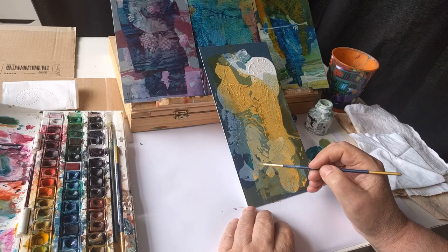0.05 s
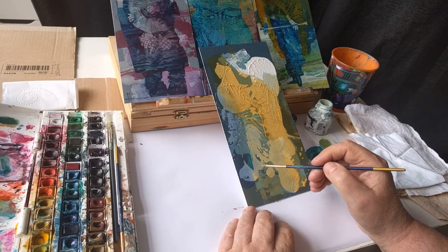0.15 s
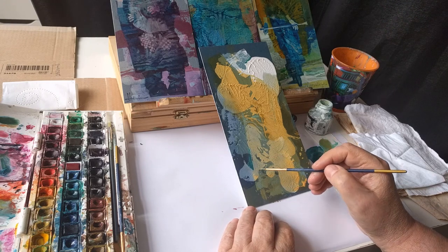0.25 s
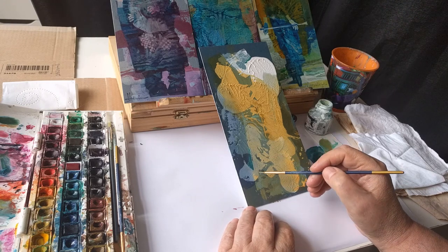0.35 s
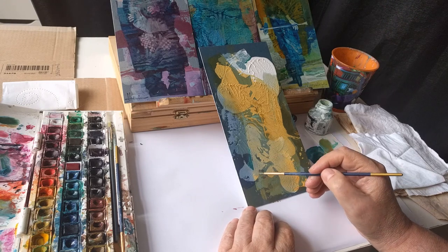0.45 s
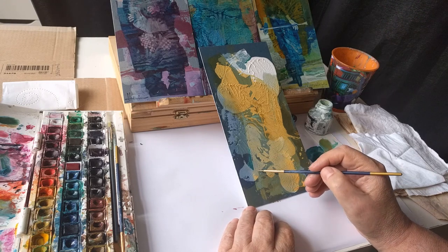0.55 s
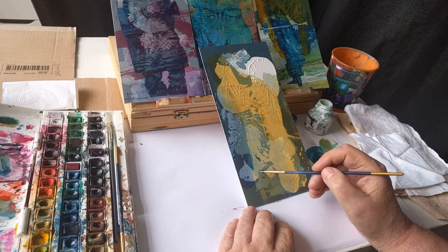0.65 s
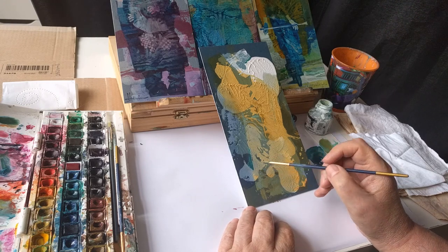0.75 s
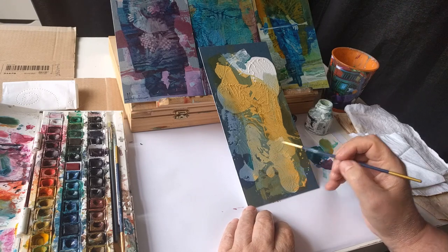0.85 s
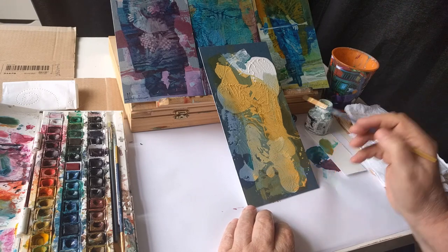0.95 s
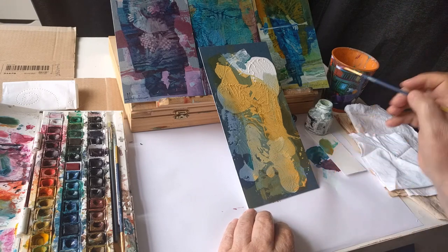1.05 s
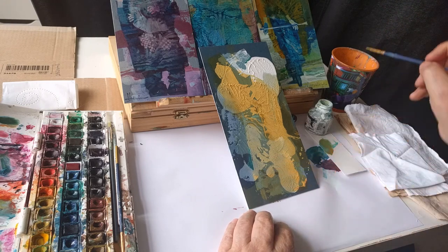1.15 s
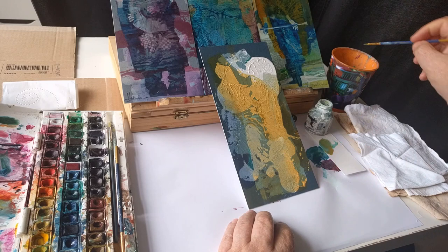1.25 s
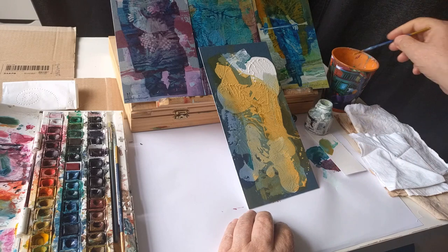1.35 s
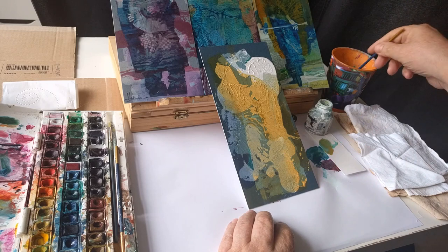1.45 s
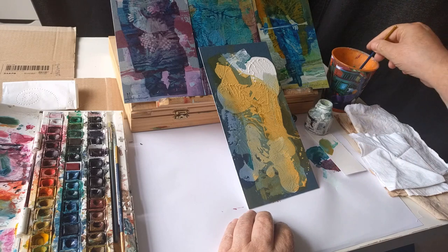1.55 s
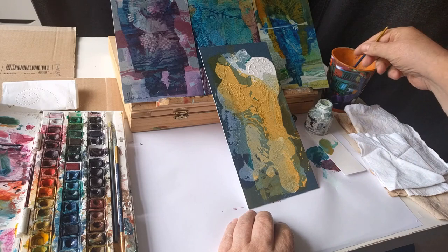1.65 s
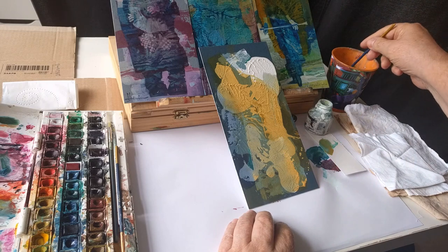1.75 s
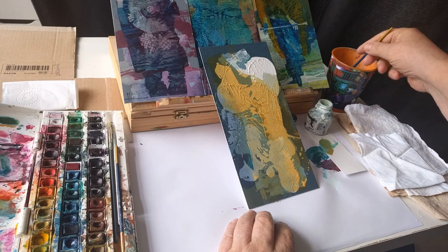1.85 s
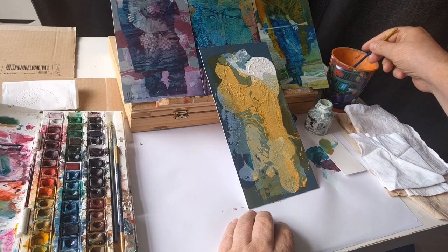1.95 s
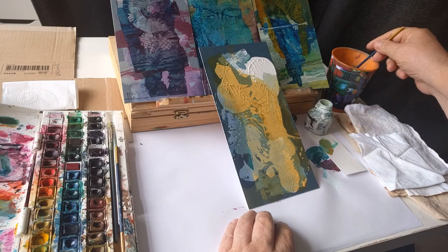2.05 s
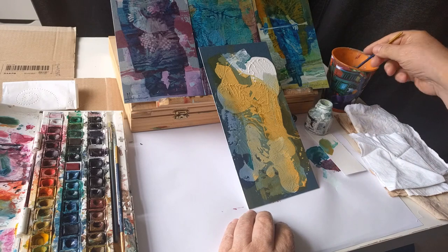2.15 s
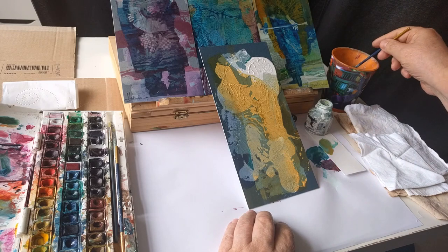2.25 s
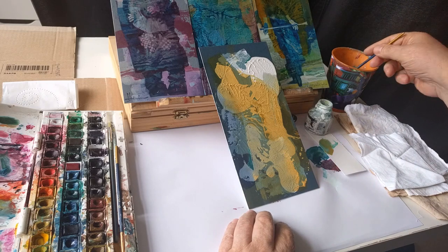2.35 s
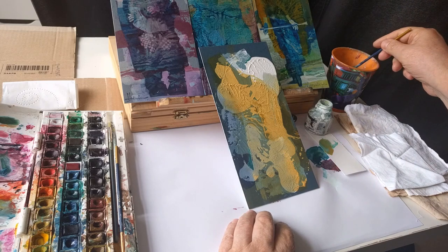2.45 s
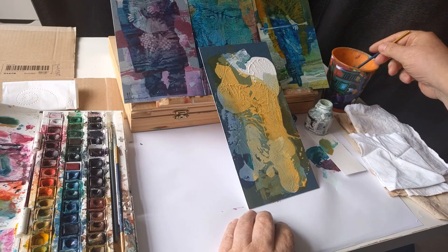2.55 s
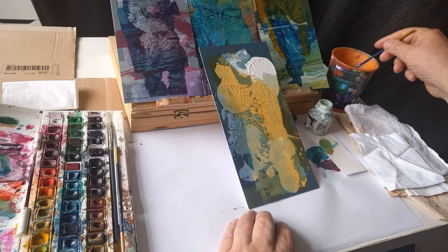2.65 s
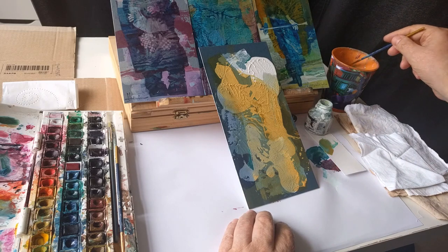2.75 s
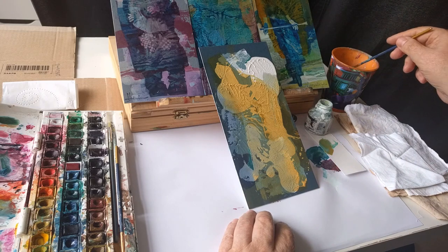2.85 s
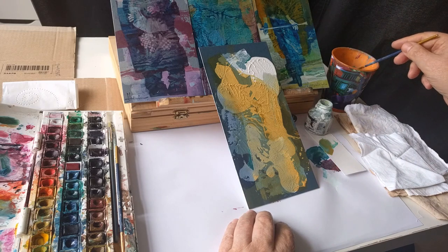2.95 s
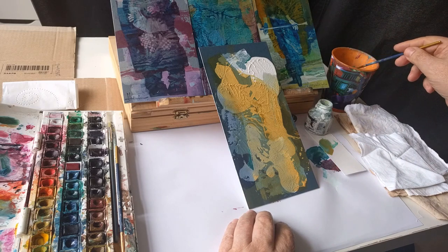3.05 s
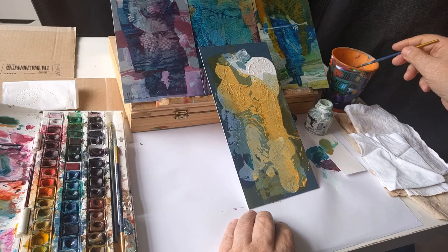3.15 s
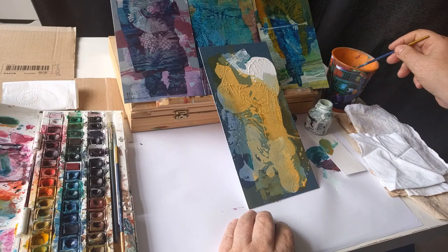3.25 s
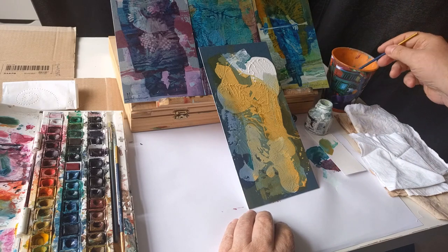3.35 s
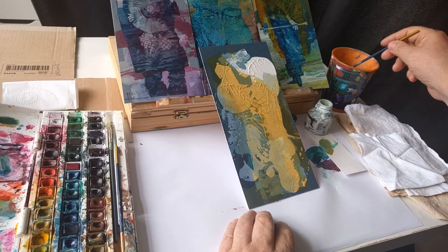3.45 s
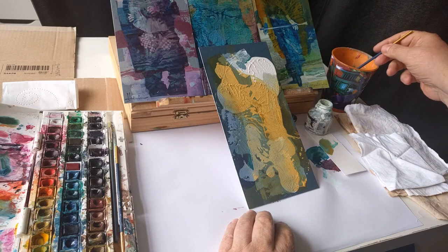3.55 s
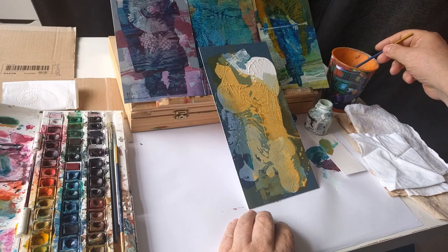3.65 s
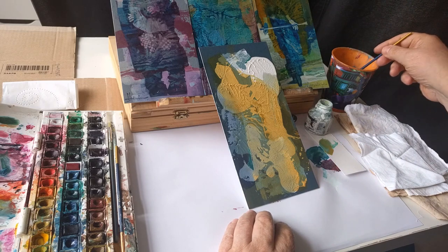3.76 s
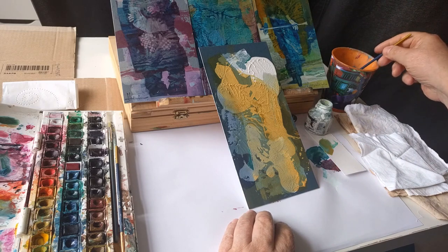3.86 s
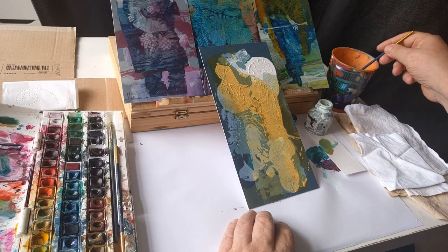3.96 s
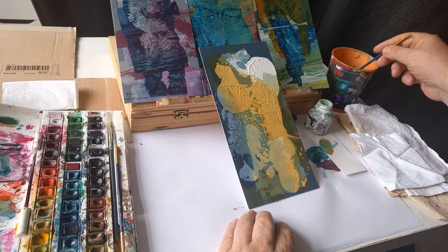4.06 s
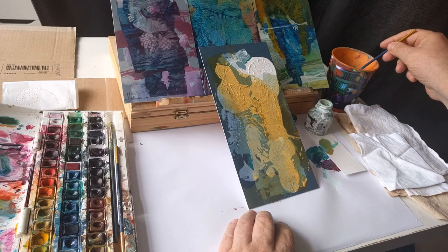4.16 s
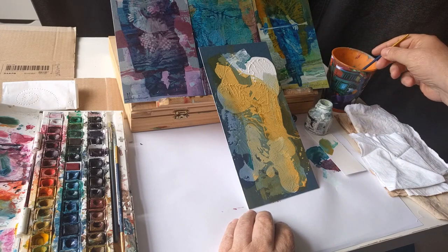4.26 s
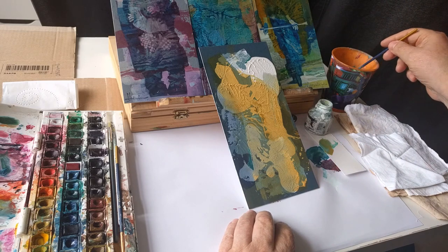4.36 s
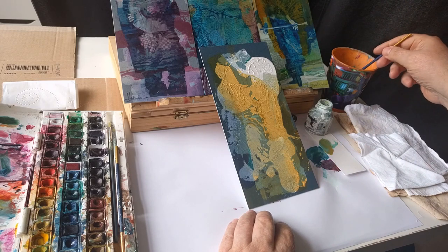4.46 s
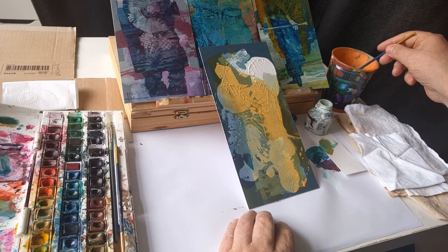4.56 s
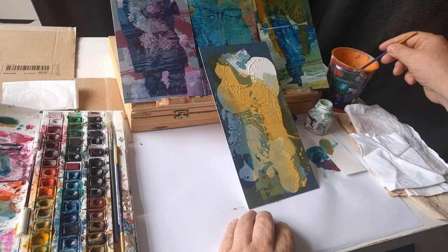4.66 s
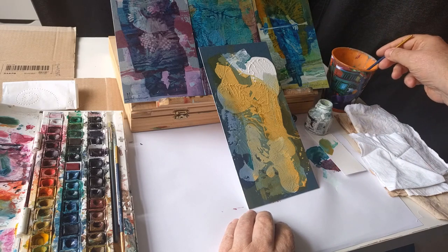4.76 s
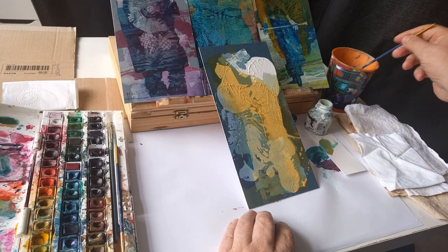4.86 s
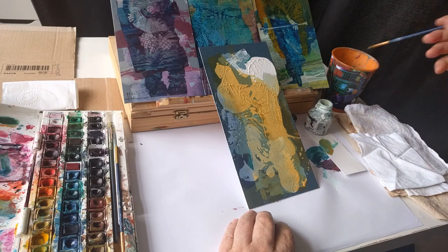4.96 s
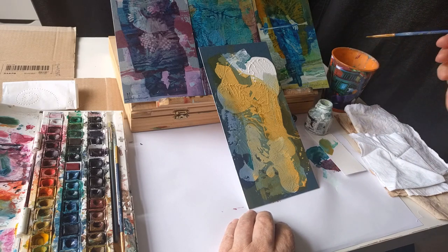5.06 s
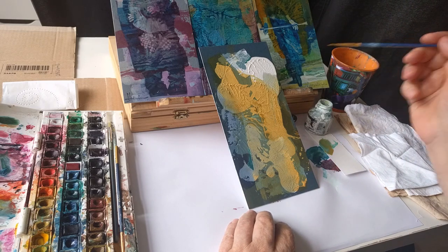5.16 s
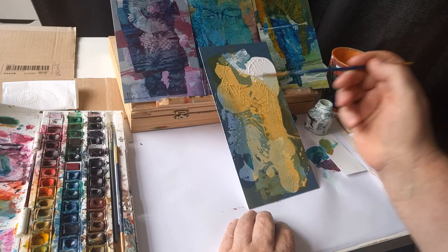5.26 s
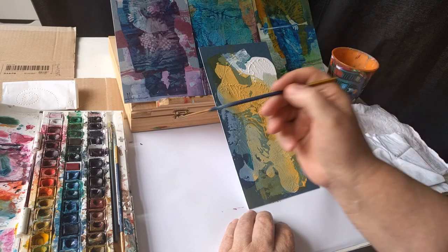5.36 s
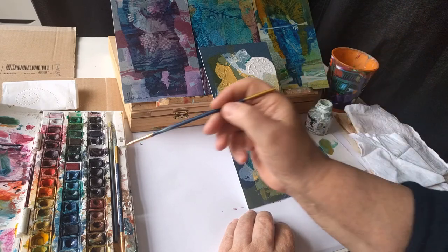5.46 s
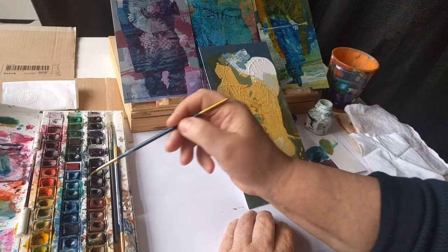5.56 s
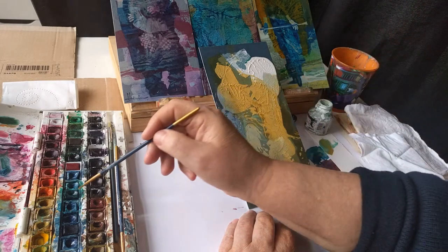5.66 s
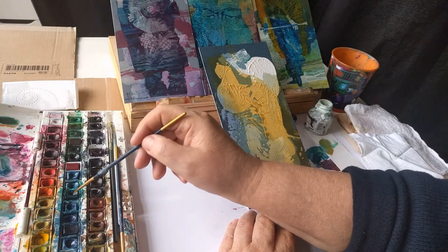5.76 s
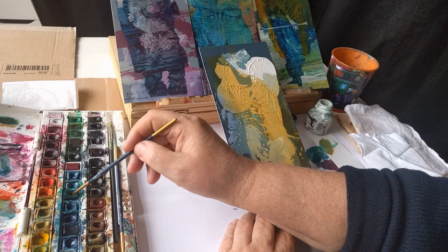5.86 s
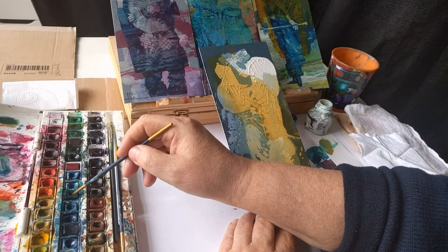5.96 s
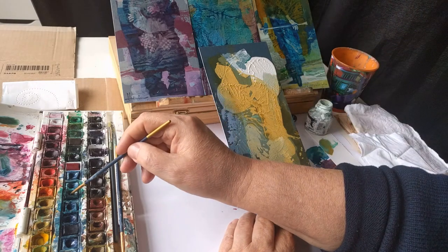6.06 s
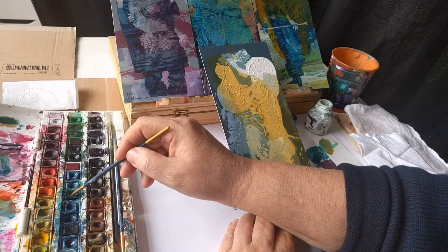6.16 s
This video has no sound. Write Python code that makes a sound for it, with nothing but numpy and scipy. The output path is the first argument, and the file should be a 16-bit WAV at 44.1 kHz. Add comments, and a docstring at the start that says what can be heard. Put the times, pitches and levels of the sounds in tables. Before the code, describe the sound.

In a small quiet room, a brush knocks a water jar with sharp, dry clinks, two of them strong, then stirs the water with soft sloshes, plops and fizz. After a short lull a second bout begins with a lighter clink. It stops, and a small dry dab ends it. Close microphone, faint hiss and low hum.

```python
"""A paintbrush rinsed in a jar of water knocks the jar four times: hard contacts excite wall modes.
It stirs the water in two bouts, whose sloshes, plops, trickle and fizz are decaying sines of trapped air.
Ticks, droplets and a late dab of the brush are short pings and noise bursts, heard with the jar in a small room.
Table bumps and the rustling sleeve are shaped noise, over the microphone's hiss, a low hum and a thin whine."""
import sys
import numpy as np
from scipy import signal
from scipy.fft import rfft, irfft
from scipy.io import wavfile

SR = 44100
rng = np.random.default_rng(int(sys.argv[2]) if len(sys.argv) > 2 else 0)


def unload_audio(sound):
    """Save the sound as a 16-bit wav file, at the path given as the first command line argument."""
    columns = np.transpose(np.atleast_2d(sound))
    # keep every value between -1 and 1, then stretch to whole-number steps
    steps = np.round(np.clip(columns, -1, 1) * 32767)
    wavfile.write(sys.argv[1], SR, steps.astype(np.int16))


N = 274302
TIME = np.arange(N) / SR


def amp(db):
    """Level: decibels become an amplitude ratio."""
    return 10 ** (np.asarray(db) / 20)


def evened(x):
    """Normalisation: the signal is scaled to an rms of one."""
    return x / np.sqrt(np.mean(x ** 2) + 1e-20)


def read(points, hz):
    """Spectral interpolation: a table is read on a logarithmic frequency axis."""
    f, value = np.transpose(points)
    return np.interp(np.log(hz + 1e-6), np.log(f), value)


def add(mix, s, sound):
    """Superposition: a sound is summed into the mix from time s."""
    part = mix[max(round(s * SR), 0):][:len(sound)]
    part += sound[:len(part)]


def decay(t, t60):
    """Exponential damping: the amplitude falls 60 dB in t60 seconds."""
    return np.exp(-np.log(1000) * t / t60)


def swell(t, peak_s):
    """Rise and fall: an envelope that reaches one at peak_s and then dies away."""
    return t / peak_s * np.exp(1 - t / peak_s)


def noise(spectrum, size):
    """Spectral shaping: white noise is filtered to a given spectrum at unit rms."""
    white = rfft(rng.standard_normal(size))
    gain = amp(read(spectrum, np.fft.rfftfreq(size, 1 / SR)))
    return evened(irfft(white * gain, size))


def click(colour_db, size=2048):
    """Minimum phase: a causal pulse of peak one gets its shape from the spectrum colour_db(Hz)."""
    log_gain = np.log(amp(colour_db(abs(np.fft.fftfreq(size, 1 / SR)))))
    pulse = np.fft.ifft(np.exp(np.conj(signal.hilbert(log_gain)))).real
    return pulse / abs(pulse).max()


def bubble(hz, t60, rise=0.04, onset_s=0.00096):
    """Bubble resonance: a trapped air pocket rings, its pitch climbing as it nears the surface."""
    t = np.arange(int(t60 * SR) + 2) / SR
    # the pitch climbs by the fraction `rise` over t60, passing hz a quarter of the way
    phase = 2 * np.pi * hz * t * (1 + rise * (t / t60 - .5) / 2)
    return np.sin(phase) * decay(t, t60) * (1 - np.exp(-t / onset_s))


# hiss spectrum: pitch_hz [Hz], level_db [dB, relative]
HISS_SPECTRUM = [(20, -5), (40, -3), (60, -2), (85, -7.5), (130, 1), (185, 5.5), (260, -4.5), (600, -7),
                 (1500, -14.5), (3000, -16), (5500, -11.5), (6500, -12.5), (7500, -5.5), (8700, 2),
                 (9500, -9.5), (11500, -16), (14000, -14.5), (15700, -17)]
HUM_HZ, WHINE_HZ = 59.2, 9000
HUM_DB, WHINE_DB = -64, -78  # rms


def background(hiss_db=-60.5, waver_hz=4):
    """Stationary noise and tones: steady hiss, a slightly wavering low hum and a thin electrical whine."""
    slow = [(waver_hz, 0), (3 * waver_hz, -30), (100, -100)]
    drift, wander = noise(slow, N), noise(slow, N)
    # a complex sway moves both the strength and the phase of the hum
    sway = 1 + .25 * (drift + 1j * wander)
    hum = (sway * np.exp(2j * np.pi * HUM_HZ * TIME)).real
    whine = np.sin(2 * np.pi * WHINE_HZ * TIME)
    hiss = amp(hiss_db) * noise(HISS_SPECTRUM, N)
    return hiss + amp(HUM_DB) * evened(hum) + amp(WHINE_DB) * evened(whine)


# cloth spectrum: pitch_hz [Hz], level_db [dB, relative]
CLOTH_SPECTRUM = [(30, -4.5), (70, 7.5), (110, 1.5), (180, -4), (290, -5.5), (400, -2), (600, -10),
                  (1200, -10), (2200, -12), (2800, -18.5), (3600, -15), (4500, -45), (14000, -29.5)]
# the arm lifts, reaches for the jar, stirs twice and crosses to the paints:
# middle_s [s], level_db [dB, added in power to the resting level], half_length_s [s]
ARM_MOVES_TABLE = [(0.712, -68, 0.094), (1.322, -66, 0.18), (2.25, -67, 0.65), (4.3, -69, 0.77),
                   (5.99, -61, 0.27)]


def sleeve(rest_db=-69.5):
    """Friction noise: cloth rubs softly, its power swelling and fading with each move of the arm."""
    power = amp(rest_db) ** 2
    for s, db, half in ARM_MOVES_TABLE:
        power = power + amp(db) ** 2 * np.exp(-((TIME - s) / half) ** 2)
    return np.sqrt(power) * noise(CLOTH_SPECTRUM, N)


# the hand and the jar bump the table: start_s [s], level_db [dB], pitch_hz [Hz]
TABLE_BUMPS = [(0.359, -61, 188), (0.41, -65, 177), (.7, -60, 192), (1.749, -59, 232), (4.331, -59.5, 139),
               (4.678, -68, 170)]


def nudges(peak_s=0.018, size=16384):
    """Damped low-frequency impact: soft, dull bumps of the table top are narrow noise that swells and dies."""
    out, t = np.zeros(N), np.arange(size) / SR
    for s, db, hz in TABLE_BUMPS:
        thud = noise([(hz / 2, -25), (hz, 0), (1.3 * hz, -14), (10 * hz, -45), (20 * hz, -80)], size)
        add(out, s, amp(db) * thud * swell(t, peak_s))
    return out


# the brush touches the paint box: pitch_hz [Hz], level_db [dB, relative]
DAB_SPECTRUM = [(600, -20), (2000, 3), (2800, -2), (4200, -3), (7000, -11), (14000, -28)]


def dab(start_s=6.042, level_db=-46, fade_s=0.0019, size=512):
    """Impact noise: one dry click of the brush on a paint pan is a fast-fading noise burst."""
    out = np.zeros(N)
    burst = noise(DAB_SPECTRUM, size) * np.exp(-np.arange(size) / SR / fade_s)
    add(out, start_s, amp(level_db) * burst)
    return out


# drips and light taps of the brush: start_s [s], level_db [dB, before ping_gain_db],
# pitch_hz [Hz], crack_db [dB, relative to level_db]
DRIPS_AND_TAPS = [(0.2453, -32, 8800, -25), (1.8157, -29, 8600, -21), (1.8247, -25, 9000, -27),
                  (2.1185, -29.5, 9400, -28), (2.2222, -30, 9900, -22), (2.282, -39, 9200, -7.5),
                  (2.975, -42, 8250, -9.5), (3.4255, -45.5, 8000, -5), (3.4706, -44.5, 8850, -2.5),
                  (3.6018, -34, 9300, -25), (4.188, -43.5, 8930, -5), (4.2138, -28, 9470, -19),
                  (4.392, -41.5, 8700, -5), (4.461, -34, 10600, -23), (4.527, -34, 11900, -17),
                  (4.714, -34.5, 8000, -13.5), (4.7404, -31.5, 6130, -16), (4.8583, -31, 8350, -21),
                  (5.1316, -29.5, 9100, -26), (5.398, -32, 9800, -22), (5.9728, -31, 7400, -18.5)]
# crack spectrum: pitch_hz [Hz], level_db [dB, relative]
CRACK_SPECTRUM = [(1500, -18), (4000, -5), (6500, 1.5), (8700, 7.5), (11000, -5), (15000, -20)]


def ticks(ping_gain_db=1, cycles=28, crack_s=0.0035, size=256):
    """Impact and resonance: a bright ping of a few milliseconds sounds over a short, broad crack."""
    out, t = np.zeros(N), np.arange(size) / SR
    for s, db, hz, crack_db in DRIPS_AND_TAPS:
        ping = bubble(hz, cycles / hz, rise=0.096, onset_s=2 / hz)
        add(out, s, amp(db + ping_gain_db) * ping)
        crack = noise(CRACK_SPECTRUM, size) * np.exp(-t / crack_s)
        add(out, s, amp(db + crack_db) * crack)
    return out


# course of the stirring: time_s [s], vigour [0-1]
STIRRING_VIGOUR = [(1.4, 0), (1.6, .45), (2.3, 1), (2.75, .9), (2.95, .3), (3.3, .25), (3.55, .95),
                   (4.72, .9), (5.0, .1)]


def fizz(count=300, level_db=-53, spread_db=10, low_hz=4000, high_hz=12000, cycles=18):
    """Random bubble bursts: faint bubbles grow denser with the vigour of stirring; few are loud."""
    out = np.zeros(N)
    for when, chance, pitch, strength in rng.random((count, 4)):
        s = when * N / SR
        hz = low_hz * (high_hz / low_hz) ** pitch
        if chance < np.interp(s, *np.transpose(STIRRING_VIGOUR)):
            db = level_db + spread_db * strength ** 3
            add(out, s, amp(db) * bubble(hz, cycles / hz, onset_s=0.0001))
    return out


def trickle(count=260, level_db=-62, spread_db=13, pocket_hz=1450, octaves=.3, cycles=40):
    """Random bubble entrainment: swirling water trickles softly while the stirring is brisk."""
    out = np.zeros(N)
    for (when, chance, strength), pitch in zip(rng.random((count, 3)), rng.standard_normal(count)):
        s = when * N / SR
        hz = pocket_hz * 2 ** (octaves * pitch)
        # the cube confines the trickle to vigorous moments
        if chance < np.interp(s, *np.transpose(STIRRING_VIGOUR)) ** 3:
            db = level_db + spread_db * strength ** 2
            add(out, s, amp(db) * bubble(hz, cycles / hz, rise=.1, onset_s=.0015))
    return out


# sweeps of the brush through the water, shared by the droplets, wake, gurgle and sloshes:
# start_s [s], spray_db [dB], length_s [s], spray_pitch_hz [Hz], slosh_db [dB, relative to spray_db,
# before heave_db], lag_s [s, until an air pocket closes], pocket_db [dB], pocket_pitch_hz [Hz]
SWEEPS = [(1.497, -65, .01, 3050, -8, 0, -66, 1600), (1.582, -63.5, 0.014, 3660, -12, 0.0072, -64, 1700),
          (1.632, -53, 0.0075, 960, 4, .01, -51, 1380), (1.738, -59.5, .03, 1350, 12, .01, -60, 1280),
          (1.899, -58.5, 0.025, 1210, 8, .005, -55, 1460),
          (2.097, -54.5, .012, 1310, 4, 0.035, -46.5, 1546),
          (2.276, -55, 0.024, 1690, 6.5, 0.042, -36, 1303),
          (2.471, -55.5, .03, 2750, 10.5, .012, -33.5, 1217), (2.653, -52, .014, 1930, 2, .001, -33, 1313),
          (2.776, -62, 0.031, 2100, 4, 0, -60, 1340), (3.616, -55, .034, 1590, 4.5, .003, -37, 1417),
          (3.8, -54, 0.039, 1110, 1.5, .018, -41, 1184), (3.912, -61, .018, 1600, -9, .005, -58, 1450),
          (4.022, -55.5, 0.012, 2100, -10, .005, -56, 1600), (4.139, -57, .009, 4030, 1, .005, -45.5, 1206),
          (4.193, -55.5, .024, 2400, 0.5, 0.0036, -37, 1500), (4.318, -70, .03, 1500, 21, 0, -43, 1425),
          (4.381, -59, .04, 2400, 6, .004, -36, 1454), (4.481, -58.5, .012, 4100, 4, 0.00042, -38.5, 1440),
          (4.543, -57.5, 0.047, 2230, -2.5, 0.0076, -36, 1250),
          (4.704, -69.5, 0.028, 1780, -1, .012, -45.5, 1350)]


def droplets(count=2, level_db=-4, flight_s=0.12, low_hz=6000, high_hz=11000, cycles=28):
    """Drop impact: a collapsing air pocket flicks up droplets that land with tiny pings."""
    out = np.zeros(N)
    for s, *_, pocket_db, _ in SWEEPS:
        for when, pitch in rng.random((count, 2)):
            hz = low_hz * (high_hz / low_hz) ** pitch
            ping = bubble(hz, cycles / hz, rise=0.096, onset_s=2 / hz)
            add(out, s + when * flight_s, amp(pocket_db + level_db) * ping)
    return out


def wake(count=3, level_db=-9, wake_s=.11, fade_db_per_s=40, centre_hz=3250, octaves=.12, cycles=38):
    """Bubble wake: a few small bubbles surface behind each sweep, louder behind a loud air pocket."""
    out = np.zeros(N)
    for s, *_, pocket_db, _ in SWEEPS:
        for when, pitch in zip(wake_s * rng.random(count) ** 2, rng.standard_normal(count)):
            hz = centre_hz * 2 ** (octaves * pitch)
            db = pocket_db + level_db - fade_db_per_s * when
            add(out, s + when, amp(db) * bubble(hz, cycles / hz, rise=0.16, onset_s=0.0011))
    return out


# lone bubbles, large and small, and the jar's low body tone at the first knock (1.6325 s):
# start_s [s], level_db [dB], pitch_hz [Hz]
BUBBLES_AND_BODY_TONE = [(1.6325, -44, 820), (1.866, -49, 1640), (2.399, -45, 3100), (2.451, -39.5, 1464),
                         (2.473, -35, 1450), (2.548, -39, 3480), (2.602, -49, 862), (2.64, -43, 3010),
                         (2.68, -39, 1360), (3.583, -45, 870), (3.619, -40, 1960), (3.812, -34, 3350),
                         (4.023, -39.5, 3570), (4.394, -42, 2040), (4.481, -38.5, 4150), (4.506, -47, 880),
                         (4.554, -42, 3360), (4.6614, -44, 1424)]


def bubbles(rise_per_khz=0.036, cycles=42):
    """Bubble scaling: smaller bubbles ring higher and shorter and chirp more; one row is the jar's body tone."""
    out = np.zeros(N)
    for s, db, hz in BUBBLES_AND_BODY_TONE:
        tone = bubble(hz, cycles / hz, rise=rise_per_khz * hz / 1e3, onset_s=0.00063)
        add(out, s, amp(db) * tone)
    return out


def gurgle(count=18, octaves=0.14, t60=0.022, size_db=3, level_db=-20, swell_s=.016,
           ring_cycles=49.5, size=8192):
    """Cavity collapse: a pocket of air under each sweep plops, then breaks into like-sized bubbles."""
    out, t = np.zeros(N), np.arange(size) / SR
    for s, *_, lag, db, hz in SWEEPS:
        add(out, s + lag, amp(db) * bubble(hz, ring_cycles / hz, rise=0.036, onset_s=0.0012))
        stream = np.zeros(size)
        times = (np.arange(count) + rng.random(count)) / count  # one bubble in each equal slot
        for when, pitch, strength in zip(times, *rng.standard_normal((2, count))):
            small = bubble(hz * 2 ** (octaves * pitch), t60)
            add(stream, when * t[-1], amp(size_db * strength) * small)
        add(out, s + lag, amp(db + level_db) * evened(stream) * swell(t, swell_s))
    return out


# water heaving in the jar: pitch_hz [Hz], level_db [dB, relative]
HEAVE_SPECTRUM = [(60, -13), (130, 0), (185, 0), (235, 5), (320, -3), (420, 2), (560, -6.5), (900, -29),
                  (1800, -23)]


def sloshes(count=12, cycles=19, octaves=0.37, size_db=4, heave_db=-9, size=8192):
    """Entrainment and bulk motion: a sweep sheds a cluster of tiny bubbles while the water heaves beneath."""
    out, t = np.zeros(N), np.arange(size) / SR
    for s, db, length, centre_hz, low_db, *_ in SWEEPS:
        spray = np.zeros(size)
        for when, pitch, strength in zip(rng.random(count) ** 2, *rng.standard_normal((2, count))):
            hz = min(centre_hz * 2 ** (octaves * pitch), SR / 3)
            tiny = bubble(hz, cycles / hz, onset_s=0.00033)
            add(spray, when * length, amp(size_db * strength) * tiny)
        # the spray's energy grows with the length of the sweep
        add(out, s, amp(db) * evened(spray) * np.sqrt(length * SR / size))
        heave = noise(HEAVE_SPECTRUM, size) * swell(t, length / 2)
        add(out, s, amp(db + low_db + heave_db) * heave)
    return out


# brush against jar: start_s [s], level_db [dB], rebound_delay_ms [ms], rebound_db [dB, relative to contact],
# mids_db [dB], top_treble_db [dB], wall_ring_db [dB, relative to level_db],
# spot_pitch_hz [Hz, of the struck spot], spot_ring_db [dB, relative to level_db]
KNOCKS = [(1.6315, -11.5, 0.55, -31, -2, -2, -3.5, 7860, -37),
          (1.7428, -24.5, 0.93, 3.5, -16, -1, -1, 6910, -13.5),
          (1.8960, -7.5, 0.795, -9.5, -4, 2.5, 0, 2015, -29.5),
          (3.802, -24, 0.79, 10, -0.5, -2, 5, 7030, -15)]
# contact spectrum: pitch_hz [Hz], level_db [dB, relative]
CONTACT_SPECTRUM = [(100, -30), (330, -18), (560, -28), (850, -29), (1500, -9.5), (2600, -12.5), (3300, 1),
                    (4300, -5), (6000, 3.5), (7000, -4), (8700, 10), (9600, 4), (10800, -8), (13500, -13.5),
                    (15700, -17.5)]
# modes of the jar wall: pitch_hz [Hz], level_db [dB, relative to the wall ring], t60_s [s]
WALL_MODES = [(3175, -34, 0.046), (5260, -34, 0.06), (5631, -39, .15), (6040, -40.5, 0.1),
              (5950, -42, 0.097), (5900, -28, 0.087), (7630, -34, 0.055), (7600, -40, 0.12),
              (8800, -38, 0.044), (9030, -27.5, 0.05)]


def clinks(mids_hz=3000, mids_octaves=0.62, top_hz=10500, spread_s=0.000494,
           spot_t60=.04, spot_spread_db=1.5, size=2048):
    """Impact and modal decay: a hard contact and quick rebound, then the water-damped wall rings briefly."""
    out, t, f = np.zeros(N), np.arange(SR // 3) / SR, np.fft.rfftfreq(size, 1 / SR)
    # bending waves run slower at low pitch, which spreads the contact over a moment
    delay_s = spread_s * np.clip(top_hz / (f + mids_hz) - .5, 0, 2)
    dispersion = np.exp(-2j * np.pi * np.cumsum(delay_s) * SR / size)
    for s, db, rebound_ms, rebound_db, mids_db, top_db, ring_db, spot_hz, spot_ring_db in KNOCKS:
        def colour_db(hz):
            """Spectral balance: the contact spectrum with this knock's mids and top treble."""
            mids = np.exp(-.5 * (np.log2((hz + 1) / mids_hz) / mids_octaves) ** 2)
            top = np.clip((hz - top_hz) / 1000 + .5, 0, 1)
            return read(CONTACT_SPECTRUM, hz) + mids_db * mids + top_db * top

        contact = amp(db) * irfft(rfft(click(colour_db), size) * dispersion)
        add(out, s, contact)
        add(out, s + rebound_ms / 1000, amp(rebound_db) * contact)
        # each spot on the wall favours other modes, with one tone of its own
        for (hz, mode_db, t60), spot in zip(WALL_MODES, rng.standard_normal(len(WALL_MODES))):
            gain = amp(db + ring_db + mode_db + spot_spread_db * spot)
            add(out, s, gain * decay(t, t60) * np.sin(2 * np.pi * hz * t))
        spot_ring = decay(t, spot_t60) * np.sin(2 * np.pi * spot_hz * t)
        add(out, s, amp(db + spot_ring_db) * spot_ring)
    return out


# echoes from nearby boards and table: delay_s [s], level_db [dB, relative to the direct sound]
CLOSE_ECHOES = [(.0066, -26), (.0073, -8), (.0087, -41.5), (.0098, -42), (0.0099, -15), (0.016, -45)]
# reverberation time of the room: pitch_hz [Hz], t60_s [s]
REVERB_T60 = [(150, 0.87), (500, 0.48), (1320, 0.35), (3480, 0.38), (9190, 0.3), (15000, .17)]
# strength of the room's tail: pitch_hz [Hz], level_db [dB]
REVERB_LEVEL = [(150, -4), (1300, -1), (3500, -4), (6000, -3.5), (8700, -8), (15000, -3)]


def room(x, gap_s=.006, size=256):
    """Reverberation: direct sound, a few close echoes and a short tail that dies fastest in the top treble."""
    hz, t, z = signal.stft(rng.standard_normal(SR // 2), SR, nperseg=size)
    t60 = read(REVERB_T60, hz)[:, None]
    even_energy = np.sqrt(2 * np.log(1000) / (t60 * SR))  # keeps a long decay from being louder
    z = z * decay(t, t60) * even_energy * amp(read(REVERB_LEVEL, hz))[:, None]
    response = np.zeros(SR // 2)
    response[0] = 1
    add(response, gap_s, signal.istft(z, SR, nperseg=size)[1])
    for s, db in CLOSE_ECHOES:
        add(response, s, amp([db]))
    return signal.fftconvolve(x, response)[:N]


def scene():
    """Superposition: jar and water sound in the room, over the table bumps, sleeve and background."""
    water = sloshes() + gurgle() + trickle() + bubbles() + wake() + droplets() + fizz()
    in_room = room(clinks() + water + ticks() + dab())
    return (in_room + nudges() + sleeve() + background())[None]


def record(dry, edge_hz=16150, offset=-.0009):
    """Band limiting: the recorder's low-pass edge, then its converter's small steady offset (full scale 1)."""
    low_pass = signal.firwin(127, edge_hz, window=("kaiser", 8), fs=SR)[None]
    return offset + signal.oaconvolve(dry, low_pass, "same")


dry = scene()
out = record(dry)
unload_audio(out)
```